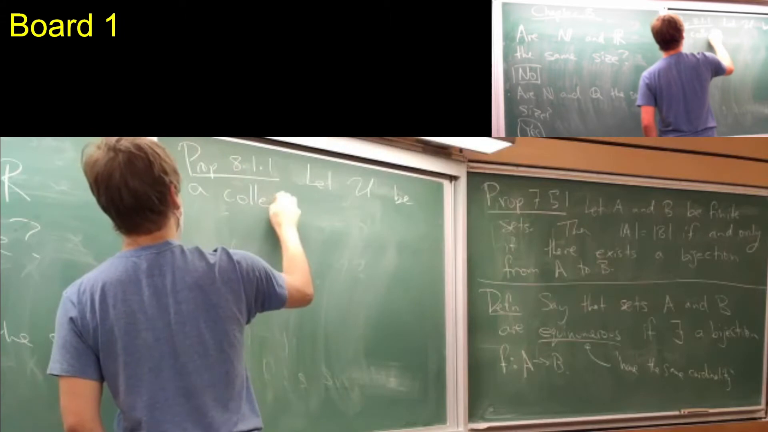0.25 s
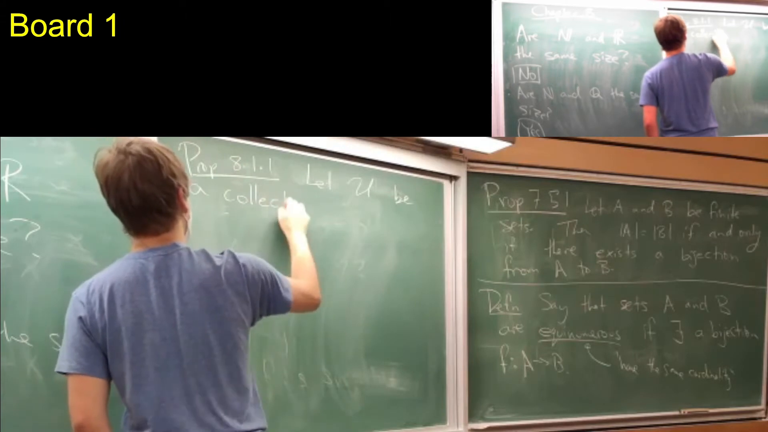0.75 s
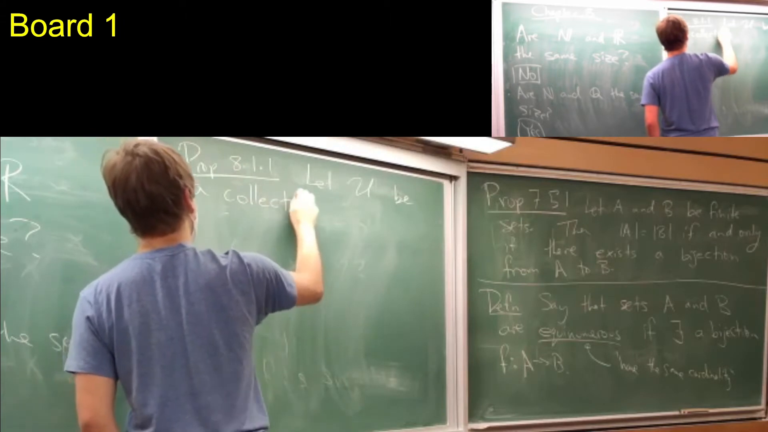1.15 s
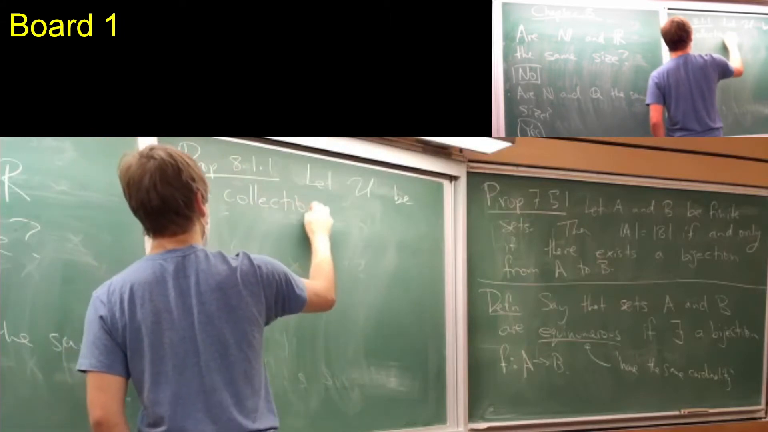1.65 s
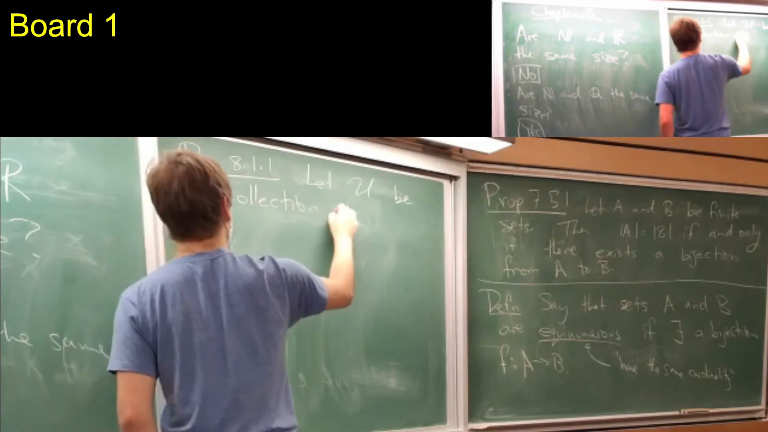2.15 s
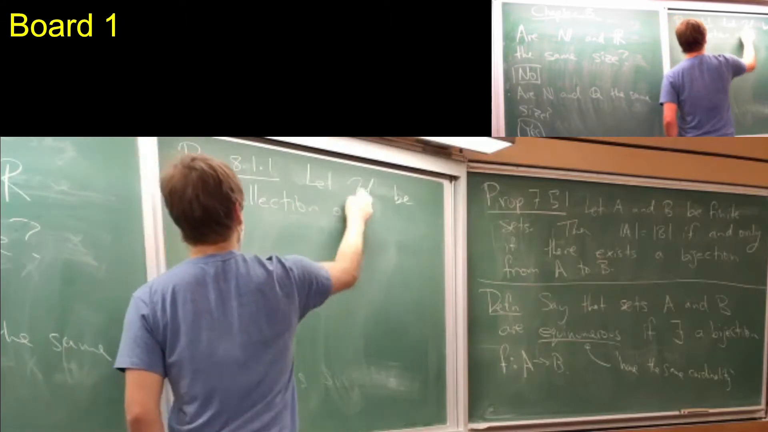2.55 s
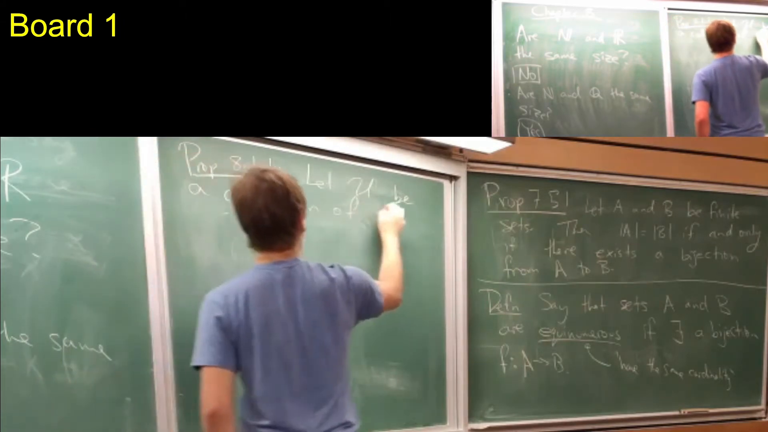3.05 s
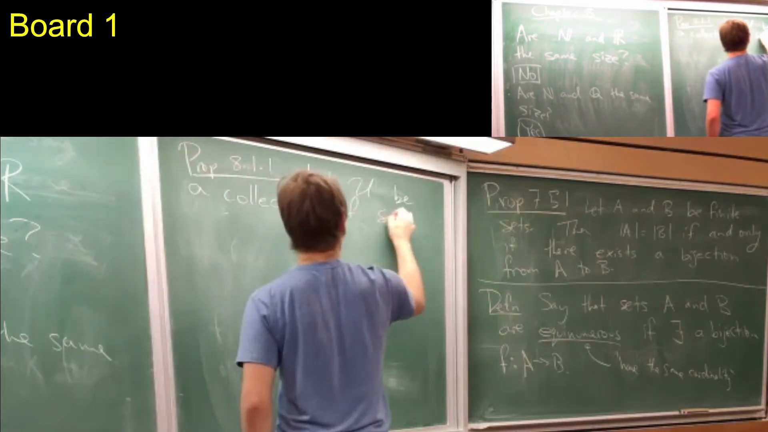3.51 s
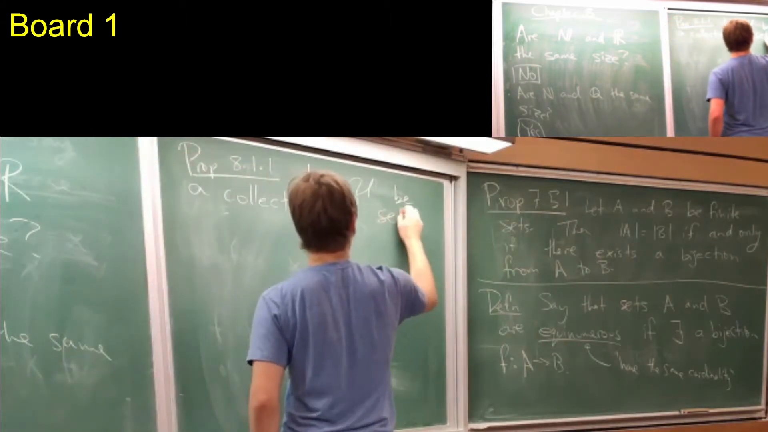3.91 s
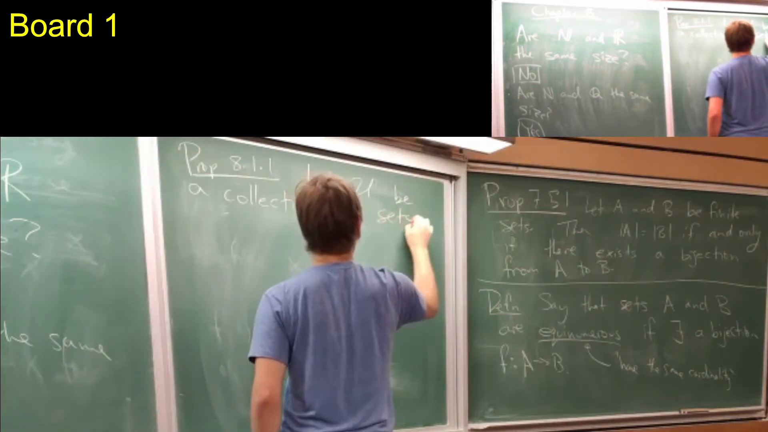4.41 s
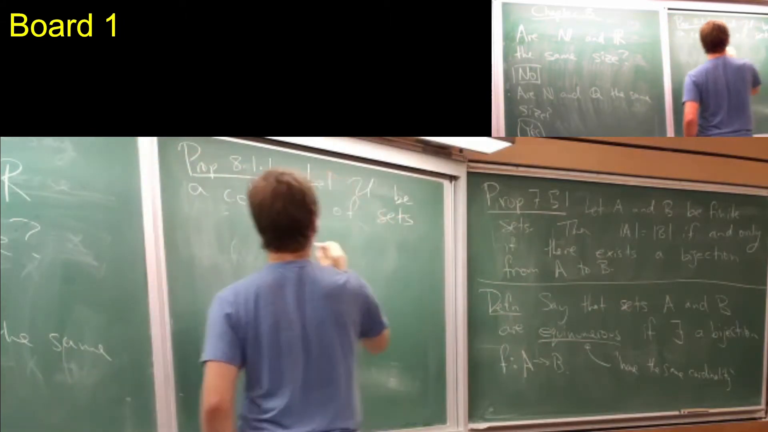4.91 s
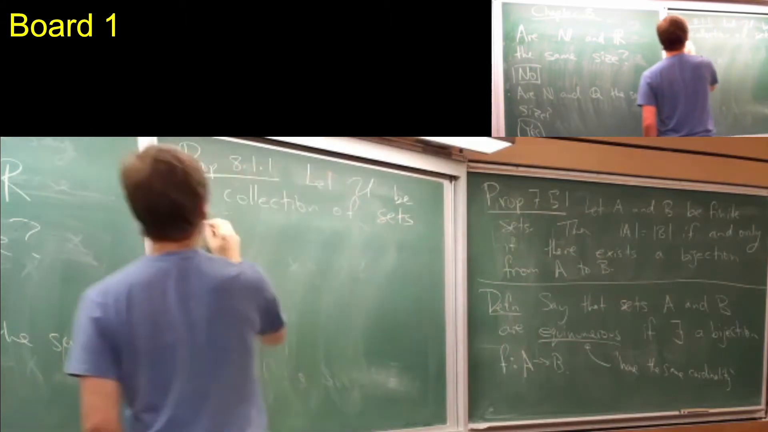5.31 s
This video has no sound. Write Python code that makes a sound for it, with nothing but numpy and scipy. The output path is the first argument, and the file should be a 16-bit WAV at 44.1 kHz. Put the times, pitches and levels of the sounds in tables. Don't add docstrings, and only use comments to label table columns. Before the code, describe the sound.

A steady run of uneven chalk taps, some hard and hollow, some light, each trailing a thin dry scratch. Later taps sound boomier, and a tight cluster of quick letters brings brief squeaks and tiny radio dropouts. Then the writing stops, the shirt rustles and thumps dully, and a lighter tap resumes. Ventilation murmurs and receiver hiss stay faint behind.

```python
import sys
import numpy as np
from scipy import signal
from scipy.fft import rfft, irfft, next_fast_len
from scipy.io import wavfile
from scipy.ndimage import uniform_filter1d

SR = 44100
rng = np.random.default_rng(int(sys.argv[2]) if len(sys.argv) > 2 else 0)


def bounce(signal):
    frames = np.transpose(np.atleast_2d(signal))
    limited = np.clip(frames, -1, 1)
    pcm = np.round(limited * 32767).astype(np.int16)
    wavfile.write(sys.argv[1], SR, pcm)


def attenuation_scalar(level_db):
    decades = np.asarray(level_db, float) / 20
    return 10 ** decades


N = 245637
T = np.arange(N) / SR

# (time [s], peak level [dB], contact time [ms], release jolt [share],
# tip wobble re knock [dB])
LANDINGS = [(0.1856, -13, 1.57, 0.92, -37), (0.4505, -6, 1.37, 0.86, -25), (.7120, -8, 1.5, .84, -9),
            (1.0659, -4.5, 1.36, 0.57, -7.5), (1.51, -16.5, 1.51, 0.79, -4.5), (1.9653, -6, 1.52, 0.77, -2),
            (2.341, -17.5, 1.57, 0.88, -50), (2.6946, -14, 1.63, 0.7, -9), (2.981, -4, 1.43, 0.59, -5.5),
            (3.7398, -3.5, 1.5, 0.45, -6.5), (3.9946, -6.5, 1.74, 0.72, -4.5),
            (4.1227, -18.5, 1.59, 2.5, -1.5), (5.415, -11.5, 0.55, 0.09, -5)]
# (frequency [Hz], width [Hz], level [dB])
PANEL_MODES = [(650, 83, 0), (795, 51, -17), (990, 230, 9.5), (1270, 260, 1.5), (1410, 63, -12),
               (1786, 130, 7), (2175, 330, 3)]
# (frequency [Hz], level [dB], decay time t60 [s])
NEAR_DECAYS = [(220, -8, 0.17), (492, -5.5, 0.062), (897, -8.5, 0.064), (2050, -2.5, 0.052),
               (3430, -12.5, 0.058), (8100, -11.5, 0.082)]
# (frequency [Hz], level [dB], decay time t60 [s])
HALL_DECAYS = [(100, -9, 2.8), (244, -9.5, 0.66), (487, -21.5, 0.95), (860, -13.5, 0.52), (1360, -24, 0.23),
               (2260, -35, 0.1), (3870, -19.5, 0.64), (8100, -40, 0.68)]


def unit(x):
    return x / np.sqrt(np.mean(x ** 2))


def peak(x):
    return x / np.abs(x).max()


def band(x, hz, width):
    return signal.lfilter(*signal.iirpeak(hz, hz / width, fs=SR), x)


def body(x, modes, spread_db=0.):
    total = 0
    for hz, width, db in modes:
        total = total + attenuation_scalar(db + spread_db * rng.standard_normal()) * band(x, hz, width)
    return total


def noise(shape):
    hz, db = np.transpose(shape)
    size = next_fast_len(N, real=True)
    f = np.fft.rfftfreq(size, 1 / SR) + 1
    corners = [hz[0] / 2, *hz, hz[-1] * 2]
    levels = [db[0] - 25, *db, db[-1] - 42.5]
    gain = attenuation_scalar(np.interp(np.log(f), np.log(corners), levels))
    return unit(irfft(rfft(rng.standard_normal(size)) * gain, size)[:N])


def walk(rate):
    hold = int(SR / rate)
    steps = np.repeat(rng.standard_normal(N // hold + 1), hold)
    return 1.22 * uniform_filter1d(steps, hold)[:N]


def add(out, s, x, db):
    i = int(s * SR)
    out[i:i + len(x)] += (attenuation_scalar(db) * peak(x))[:N - i]


def echoes(x, decays, wait, size):
    t, echo = np.arange(size) / SR, 0
    for hz, db, t60 in decays:
        fade = attenuation_scalar(-60 * t / t60) * (1 - np.exp(-(t / wait) ** 2))
        hush = band(band(rng.standard_normal(size), hz, 1.13 * hz), hz, 1.35 * hz)
        echo = echo + attenuation_scalar(db) * hush * fade / np.linalg.norm(fade)
    return x + signal.fftconvolve(x, echo)[:len(x)]


def taps():
    # (frequency [Hz], width [Hz], level [dB])
    thud_modes = [(74.5, 83, -8), (160, 54, -14), (238.4, 88, -4.5), (336, 90, 0), (403, 90, 0),
                  (474, 50, -8.5)]
    # (frequency [Hz], width [Hz], level [dB])
    knocked = [(2680, 570, -29), (3450, 540, 1.5), (4490, 560, 11), (5630, 640, -17.5)]
    out, t = np.zeros(N), np.arange(SR // 12) / SR
    start = .0005

    def dip(at):
        return np.exp(-((t - at) / 0.00019) ** 2)

    for s, db, ms, release, wobble_db in LANDINGS:
        end = start + ms / 1000
        swing = np.sin(np.pi * np.clip((t - start) / (end - start), 0, 1))
        balance = swing / swing.sum() * (1 + release) * dip(start).sum()
        jolt = balance - dip(start) - release * dip(end)
        ring = peak(body(-dip(start), PANEL_MODES, spread_db=3))
        thud_db = -17.5 if s < 2.85 else -3.5
        thud = peak(body(-swing, thud_modes, spread_db=3))
        crack = rng.standard_normal(len(t)) * np.exp(-t / 0.0013) * (t > start / 2)
        chalk = peak(body(crack, knocked, spread_db=2.5) + band(crack, 4500, 1000))
        chalk_db = -3.5 + 0.31 * db + (-5.5 if s < 1.3 else 0)
        grit_db = -15 + 3.3 * db
        grit = peak(band(band(crack, 5800, 5500), 6100, 7000))
        wobble = peak(band(-dip(start), 1337 + 8.5 * db, 310))
        knock = peak(jolt) + attenuation_scalar(-12.5) * ring + attenuation_scalar(thud_db) * thud
        knock = knock + attenuation_scalar(grit_db) * grit + attenuation_scalar(chalk_db) * chalk + attenuation_scalar(wobble_db) * wobble
        near = echoes(np.pad(knock, (0, SR * 3 // 4)), NEAR_DECAYS, wait=0.0016, size=SR // 5)
        add(out, s - start, echoes(near, HALL_DECAYS, wait=0.018, size=SR * 3 // 4), db)
    return out


def scrape():
    # (start [s], end [s], scrape level [dB], scrape level at
    # lift-off [dB], panel hum level [dB])
    strokes = [(0.0, .114, -59, -61, -61), (0.203, 0.353, -57, -52, -55.5), (.49, 0.636, -58.5, -64, -51),
               (0.728, 0.94, -58.5, -59.5, -55), (1.099, 1.452, -56.5, -61.5, -52.5),
               (1.528, 1.86, -58.5, -62, -57), (1.995, 2.275, -59, -61.5, -50.5),
               (2.36, 2.632, -56.5, -65, -58), (2.718, 2.773, -59.5, -55, -50),
               (3.008, 3.636, -56.5, -57, -55), (3.775, 3.864, -55, -58, -47), (3.866, 3.93, -63, -70, -71),
               (4.015, 4.058, -56, -46, -51.5), (4.093, 4.172, -66, -54, -68), (4.199, 4.39, -55, -60, -54),
               (5.12, 5.396, -64.5, -61.5, -70), (5.446, 5.572, -57.5, -53, -72)]
    # (time [s], change [dB], half length [s])
    turns = [(0.792, 7, 0.019), (1.44, 5, .012), (1.608, -7, 0.019), (2.27, 5.5, 0.013), (2.536, 4, 0.028),
             (3.145, 4.5, 0.021), (3.293, -12, 0.027), (3.378, 3.5, 0.052), (3.448, -2, .02),
             (4.311, -9, 0.013), (0.098, 6, 0.022), (0.28, -4.5, .03), (4.385, 11, .012),
             (5.31, 2.5, 0.035)]
    # (frequency [Hz], width [Hz], level [dB])
    stick_modes = [(3560, 230, -4), (4640, 300, 1.5), (5530, 680, -8), (6920, 1040, -8.5), (8130, 1100, -6),
                   (8900, 830, -9.5), (10430, 1050, -6.5)]
    # (frequency [Hz], width [Hz], level [dB])
    hum_modes = [(1100, 370, 4), (1256, 66, 0), (1510, 1700, -17)]
    hum_fade_db_per_s, hum_per_db = 25, 1.32
    levels = np.zeros((2, N))
    turn_db = sum(db * np.exp(-((T - s) / half) ** 2) for s, db, half in turns)
    for a, b, db, lift_db, hum_db in strokes:
        on = (T >= a) & (T < b)
        elapsed = T[on] - a
        change_db = (lift_db - db) * (elapsed / (b - a)) ** 1.8 + turn_db[on]
        hum_level_db = hum_db + hum_per_db * change_db - hum_fade_db_per_s * elapsed
        levels[:, on] = attenuation_scalar([db + change_db, hum_level_db])
    press, hum = uniform_filter1d(levels, size=160)
    grain_db = 2.64 * rng.exponential(size=N) + 1.5 * walk(90) + 0.27 * walk(28)
    grains = rng.standard_normal(N) * attenuation_scalar(grain_db)
    stick = np.zeros(N)
    for hz, width, db in stick_modes:
        for side in (-1, 1):
            stick += attenuation_scalar(db + 3.9 * walk(18)) * band(grains, hz + side * 0.25 * width, 0.81 * width)
    scratch = attenuation_scalar(-3.5) * press * unit(band(stick, 5600, 6000))
    return scratch + attenuation_scalar(-2) * hum * unit(body(grains, hum_modes))


def squeaks():
    # (start [s], end [s], frequency [Hz], level [dB])
    skids = [
        (4.355, 4.398, 1130, -44.5),
        (4.365, 4.398, 4800, -50.5),
        (4.262, 4.288, 1280, -52.5),
        (3.962, 3.982, 3100, -59),
        (0.08, .112, 1080, -50.5),
        (.78, .825, 4660, -51),
    ]
    out = np.zeros(N)
    for a, b, hz, db in skids:
        swell = np.linspace(0, 1, int((b - a) * SR)) ** 0.41
        chatter = band(band(rng.standard_normal(SR // 10), hz, 0.22 * hz), hz, 0.28 * hz)
        add(out, a, swell * chatter[-len(swell):], db + 6.5)
    return out


def ticks():
    # (time [s], peak level [dB], centre [Hz], width [share of centre])
    contacts = [(0.099, -47, 1760, 1.4), (0.3301, -40.5, 4500, 0.29), (0.41, -58, 1920, 1.1),
                (0.9108, -37, 2150, 0.78), (0.96, -50, 4430, 0.77), (1.2454, -44.5, 2100, 0.57),
                (1.434, -40, 2100, 0.7), (1.5858, -48.5, 3460, 1), (1.7968, -52, 4310, .7),
                (1.8193, -45.5, 2680, 1.5), (1.918, -41.5, 2570, 1.6), (2.2587, -41, 4500, 0.49),
                (2.428, -55, 1920, 1.1), (2.866, -47, 5850, 0.59), (3.142, -40, 2100, 1.2),
                (3.5967, -48, 2070, 0.47), (3.623, -52, 4470, 0.85), (3.643, -50, 2210, 1.2),
                (3.9635, -56, 4300, 1.2), (4.047, -36, 6900, 0.68), (4.139, -47, 8000, .5),
                (3.894, -52, 7000, 1), (4.085, -63, 1950, 1.1), (4.1989, -61, 1900, 1.1),
                (4.2196, -30.5, 2800, 0.6), (4.6644, -40, 3450, 0.2), (5.054, -38, 2800, 0.7),
                (5.3555, -44.5, 2110, 0.91)]
    # (time [s], peak level [dB])
    rebounds = [
        (0.2342, -43),
        (0.4984, -36.5),
        (0.7645, -36.5),
        (1.1085, -31.5),
        (2.3823, -38.5),
        (2.738, -36),
        (3.0054, -27.5),
        (3.7703, -29),
        (4.0328, -34),
    ]
    out, t = np.zeros(N), np.arange(SR // 12) / SR
    bounces = [(s, db, 2300, 0.79) for s, db in rebounds]
    for s, db, hz, spread in sorted(list(contacts) + bounces):
        burst = rng.standard_normal(len(t)) * attenuation_scalar(-60 * t / 0.024)
        width = np.clip(spread, .1, 2) * hz
        gritty = band(band(burst, hz, width), hz, 1.3 * width)
        add(out, s, gritty + 0.4 * body(burst, PANEL_MODES), db + 0.5)
    return out


def shirt():
    # (time [s], torso sway level [dB], sleeve rustle level [dB])
    movement = [(0.0, -53, -63.5), (0.45, -62.5, -66.5), (1.15, -57, -66.5), (1.8, -61.5, -66.5),
                (2.0, -65, -61.5), (2.48, -49, -56.5), (2.64, -54, -67), (2.95, -58, -66), (3.15, -49, -61),
                (3.62, -62.5, -66.5), (4.15, -60, -65), (4.23, -42.5, -61), (4.4, -60, -59.5),
                (4.86, -55, -67), (5.02, -32, -65.5), (5.31, -41.5, -61.5), (5.39, -68, -59.5),
                (5.57, -46.5, -58)]
    # (time [s], peak level [dB], frequency [Hz])
    bumps = [(0.884, -35.5, 81), (0.919, -38, 87.16), (1.906, -36.5, 86), (4.207, -28.5, 125),
             (4.218, -29, 142), (4.504, -38.5, 146), (4.56, -41, 77), (4.69, -46, 100), (2.75, -33, 110),
             (4.262, -35, 83.33), (3.6, -39.5, 100), (1.27, -37, 80), (2.372, -34.5, 124),
             (5.174, -32.5, 99)]
    # (frequency [Hz], density [dB per Hz])
    cloth = [(300, 7.5), (700, -0.5), (1500, 0), (3000, -5.5), (6000, -13.5), (12000, -17.5)]
    s, *columns = np.transpose(movement)
    sway_db, rustle_db = (np.interp(T, s, c) for c in columns)
    t, shudder = np.arange(SR // 3) / SR, np.zeros(N)
    # rise 20 ms, fall 62 ms
    pulse = (1 - np.exp(-(t / 0.02) ** 2)) * np.exp(-t / 0.062)
    for at, db, *_ in LANDINGS:
        slack_db = 8.5 if at > 3.9 else 0
        add(shudder, at, pulse, -34.5 + 0.69 * db - slack_db)
    sway = np.sin(2 * np.pi * np.cumsum(36 + 14 * walk(25)) / SR)
    sway_gain = attenuation_scalar(sway_db - 1 + 1.5 * walk(18)) + attenuation_scalar(-9.5) * shudder
    out = sway_gain * (sway + 0.53 * noise([(20, 5), (40, 5.0), (75, -9.5)]))
    rumble = attenuation_scalar(-60.5 + 0.32 * (rustle_db + 62.5)) + attenuation_scalar(-13) * shudder
    out += rumble * attenuation_scalar(2.7 * walk(25)) * noise([(90, 4.5), (140, -1), (250, -2.0), (400, -8)])
    out += attenuation_scalar(rustle_db + 3.5 + 1.16 * walk(30)) * noise(cloth)
    out += shudder * attenuation_scalar(0.81 * walk(29.51)) * noise([(55, 1.0), (80, 0.0), (140, -6), (200, -13.0)])
    for at, db, hz in bumps:
        knock = rng.standard_normal(len(t)) * np.exp(-t / 0.012)
        add(out, at, band(band(knock, hz, 0.43 * hz), hz, 2.0 * hz), db - 0.5)
    return out


def ventilation():
    # (frequency [Hz], density [dB per Hz])
    spectrum = [(20, 7.5), (60, -14), (150, -25), (400, -11.5), (1000, -23), (3000, -42)]
    return attenuation_scalar(-66.5 + 0.88 * walk(3.38)) * noise(spectrum)


def receiver():
    # (frequency [Hz], density [dB per Hz])
    spectrum = [(100, 15), (2000, -8.5), (6000, -6.5), (15000, -7.5)]
    whine_hz, whine_db = 12023, -83
    whine = np.sqrt(2) * np.sin(2 * np.pi * whine_hz * T + 0.77 * walk(20))
    return attenuation_scalar(-64) * noise(spectrum) + attenuation_scalar(whine_db) * whine


def scene():
    small = echoes(ticks() + scrape() + squeaks(), NEAR_DECAYS, wait=0.00076, size=SR // 5)
    board = taps() + echoes(small, HALL_DECAYS, wait=0.016, size=SR)
    return (board + shirt() + ventilation())[None]


def band_limit(x):
    return signal.sosfilt(signal.butter(12, 16680, fs=SR, output="sos"), x)


def record(dry):
    # (start [s], end [s])
    drops = [
        (3.863, 3.870),
        (4.063, 4.084),
        (4.168, 4.189),
    ]
    link = np.ones(N)
    for a, b in drops:
        link[(T > a) & (T < b)] = 0
    capsule = signal.sosfilt(signal.butter(2, 11000, fs=SR, output="sos"), dry)
    x = capsule * uniform_filter1d(link, size=120) + receiver()
    x = np.tanh(1.395 * x) / 1.292
    x = signal.sosfilt(signal.ellip(8, .2, 30, 15700, fs=SR, output="sos"), x)
    return band_limit(x)


dry = scene()
out = record(dry)
bounce(out)
```